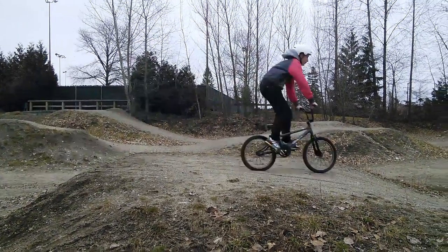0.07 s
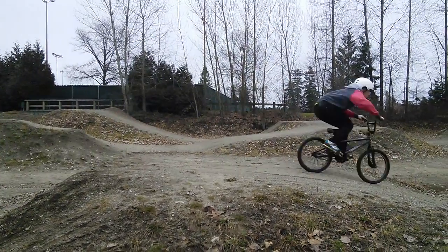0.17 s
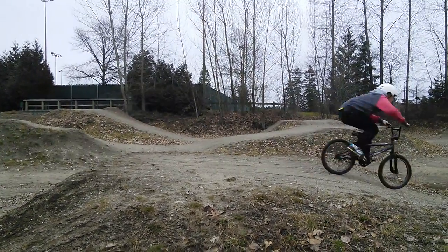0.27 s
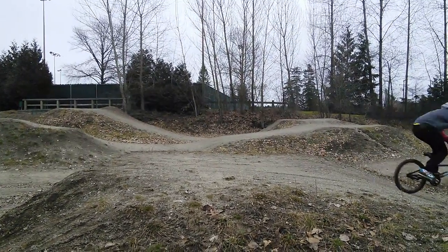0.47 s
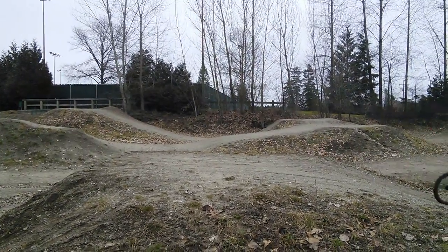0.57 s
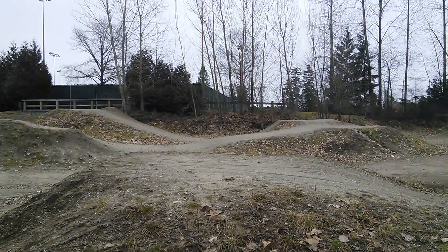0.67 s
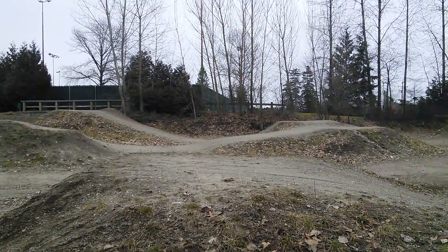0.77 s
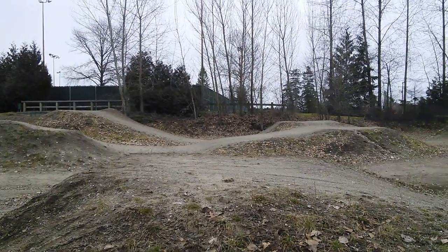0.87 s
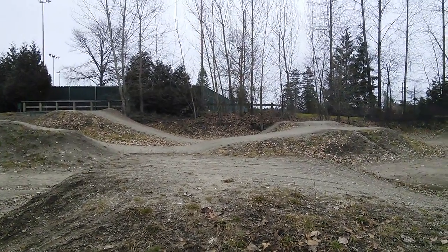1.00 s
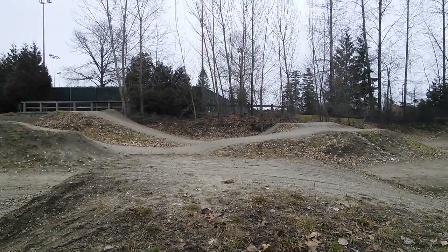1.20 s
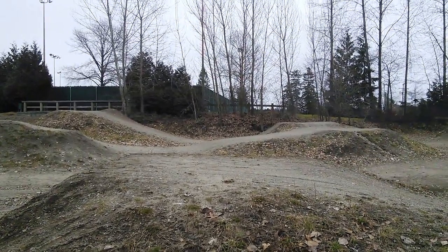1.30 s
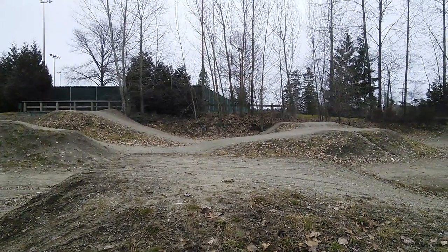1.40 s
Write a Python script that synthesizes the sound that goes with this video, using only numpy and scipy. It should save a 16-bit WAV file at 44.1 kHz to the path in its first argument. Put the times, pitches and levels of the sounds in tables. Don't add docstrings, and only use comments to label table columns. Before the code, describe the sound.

After a brief quiet moment, bicycle tyres crunch down hard and the chain rattles; the wheels grind away softly, flicking small stones, over faint distant traffic and microphone hiss on an open dirt track.

```python
import sys
import numpy as np
from scipy import signal
from scipy.fft import rfft, irfft
from scipy.io import wavfile
from scipy.ndimage import uniform_filter1d, map_coordinates

SR = 44100
rng = np.random.default_rng(int(sys.argv[2]) if len(sys.argv) > 2 else 0)


def unload_wav(signal):
    wavfile.write(
        sys.argv[1],
        SR,
        np.round(np.clip(np.atleast_2d(signal).T, -1, 1) * 32767).astype(np.int16),
    )


def invert_db(level):
    return 10 ** (np.asarray(level, dtype=float) / 20)


N = 63945


def unit(x):
    return x / np.sqrt(np.mean(x ** 2))


def colour(x, shape, lo_hz=20.0, hi_hz=20100.0):
    log_f = np.log(np.maximum(np.arange(len(x) // 2 + 1) * SR / len(x), 1))
    shape_hz, shape_db = np.array(shape, float).T

    def above(hz):
        return 0.5 + 0.5 * np.tanh((log_f - np.log(hz)) * 6)

    gain = invert_db(np.interp(log_f, np.log(shape_hz), shape_db))
    return irfft(rfft(x) * gain * (above(lo_hz) - above(hi_hz)), len(x))


def walk(rate):
    hold = int(SR / rate)
    steps = np.repeat(rng.standard_normal(N // hold + 1), hold)
    return 1.3 * uniform_filter1d(uniform_filter1d(steps, hold), hold)[:N]


def lively(x, shape, common_db, own_db, rate):
    band_hz = 20 * 2 ** np.arange(0, 10.1, 0.5)
    total = np.zeros(N)
    for lo_hz, hi_hz in zip(band_hz, band_hz[1:]):
        total += invert_db(common_db + own_db * walk(rate)) * colour(x, shape, lo_hz, hi_hz)
    return unit(total)


def add(out, s, x):
    i = int(s * SR)
    out[i:i + len(x)] += x[:N - i]


def ring(hz, t60, t, rise=0.0002):
    return np.sin(2 * np.pi * hz * t) * np.exp(-np.log(1000) * t / t60) * (1 - np.exp(-t / rise))


def grit(size):
    grains_per_s, spread_db, grain_share = 3000, 3.0, 0.6
    chance, draw = rng.random((size, 2)).T
    grain_size = invert_db(spread_db * np.minimum(-np.log(draw), 3.0))
    grains = (chance < grains_per_s / SR) * grain_size * rng.choice([-1, 1], size)
    return grain_share * unit(grains) + (1 - grain_share) * rng.standard_normal(size)


def background():
    # (f/Hz, level/dB)
    town_tone = [(30, -37), (90, -2), (150, -12.5), (370, -15), (700, -5), (1100, -13.5), (2600, -20.5),
                 (3600, -33.5)]
    # (f/Hz, level/dB)
    hiss_tone = [(3000, -30), (5300, -15), (6500, -3), (9000, 0), (15500, -1)]
    town = lively(rng.standard_normal(N), town_tone, 0, 1.2, 8.3)
    hiss = unit(colour(rng.standard_normal(N), hiss_tone))
    return invert_db(-58) * town + invert_db(-64.5) * hiss


def whirr():
    # (t/s, half-width/s, f/Hz, level/dB)
    peak_s, half_s, hz, db = (.115, .05, 2200, -59)
    air = unit(colour(rng.standard_normal(N), [(hz / 2, -30), (hz, 0), (hz * 1.5, -25)]))
    return invert_db(db) * air * np.exp(-((np.arange(N) / SR - peak_s) / half_s) ** 2)


def ground(x):
    # (lag/s, lag/s)
    lag_s = (.00047, .00035)
    top_hz = 2500
    late = map_coordinates(x, [np.arange(N) - np.linspace(*lag_s, N) * SR], mode="nearest")
    return x + invert_db(-1) * colour(late, [(top_hz, 0), (2 * top_hz, -18), (20000, -40)])


def rolling():
    # (t/s, load on the tyres/dB, spray of fine grit/dB)
    loads = [(.19, -34.5, -45), (.28, -44, -45), (.36, -43, -50), (.45, -44, -52), (.55, -44.5, -57),
             (.60, -44.5, -54.5), (.64, -43, -57), (.76, -43.5, -50.5), (.79, -47, -53), (.90, -50, -55),
             (.925, -50, -55), (1.05, -48.5, -52), (1.17, -53.5, -53.5), (1.211, -54, -60.5),
             (1.28, -55, -58.5), (1.35, -54, -58), (1.45, -56.5, -65)]
    # (f/Hz, level/dB)
    tread_tone = [(60, -62), (250, -14.5), (480, -24), (750, -5), (1500, -5), (2270, -6.5), (3600, -1.5),
                  (12000, -29.5)]
    # (f/Hz, level/dB)
    spray_tone = [(3000, -12), (6000, -5.5), (9000, -10), (12000, -10), (16000, -12.5)]
    touch_s, flicker_db = 0.1934, 1.5
    t = np.arange(N) / SR
    load_s, load_db, spray_db = np.array(loads).T
    patch_db = 1.2 * walk(60.8)
    tread = lively(grit(N), tread_tone, patch_db, flicker_db, 19.83)
    tread *= invert_db(-1 + np.interp(t, load_s, load_db))
    spray = lively(grit(N), spray_tone, patch_db, flicker_db, 20.74)
    spray *= invert_db(2.5 + np.interp(t, load_s, spray_db))
    return (ground(tread) + spray) * np.clip((t - touch_s) / 0.012, 0, 1)


def stones():
    # (t/s, peak level/dB, f/Hz, treble against body/dB)
    pebbles = [(0.409, -25, 2220, -20.5), (.513, -39, 3020, -20), (.5246, -30, 2840, -15),
               (0.5352, -36, 2380, -16), (0.5647, -26, 3020, -19), (.5745, -27.5, 3500, -27),
               (0.6058, -25.5, 3050, -19), (0.62, -42, 3800, -22), (0.713, -31, 3820, -16),
               (0.747, -22, 2280, -15), (0.9353, -25, 2160, -32), (0.9385, -29, 2640, -12),
               (0.975, -38, 2390, -12), (1.0311, -37, 3360, -5), (1.158, -39, 2060, -14),
               (0.4592, -40, 2360, -4.5), (0.743, -52, 3000, 3), (0.1454, -69, 1980, 7)]
    t60_s, rise_s, glide_per_s = 0.012, 0.0013, 90
    out, t = np.zeros(N), np.arange(SR // 50) / SR
    bent = t * (1 + glide_per_s * np.minimum(t, 0.004))
    for s, db, hz, treble_db in pebbles:
        body = ring(0.8 * hz, t60_s, bent, rise_s)
        body += 0.87 * ring(1.27 * hz, 0.59 * t60_s, bent, rise_s)
        crack = unit(colour(rng.standard_normal(len(t)), [(1500, -10), (5000, 2), (16000, -12)]))
        crack *= np.exp(-t / 0.00072)
        add(out, s - 0.0005, invert_db(db) * (2 * body + invert_db(treble_db + 11) * crack))
    return out


def chain():
    # (level/dB, t60/s)
    modes = [(-6.5, 0.1), (-7, 0.047), (2.5, 0.04), (-7, 0.019), (12, 0.0052), (-11, 0.011), (-10.5, 0.053),
             (-21, 0.0091), (-11, 0.029), (4.5, 0.0086), (-2, .028), (-7, 0.018), (-13.5, 0.045)]
    mode_hz = [7610, 7760, 8420, 8520, 8900, 9275, 10160, 11190, 13330, 13770, 15560, 2340, 4710]
    # (t/s, level/dB, free ringing/s, extra drive of the link pair/dB, fall-off from it/dB per kHz)
    slaps = [
        (0.252, -14, 0.0015, -6, 1.5),
        (0.2536, -12, 0.016, 0.5, 0.8),
        (0.4576, -52, 0.0046, 2, 5),
        (.551, -50, .008, 5.5, 12),
        (.6356, -47, .02, 6, 4),
        (.673, -35.5, .012, -6, 2.5),
        (0.7279, -31.5, .018, -10, 1),
        (0.827, -54, .015, 5, 5),
        (0.9163, -40, .004, -8, 7),
    ]
    caught_db, catch_s = -12, 0.003
    out, t = np.zeros(N), np.arange(SR // 10) / SR
    hz = np.array(mode_hz)[:, None]
    mode_db, t60 = np.array(modes).T[:, :, None]
    away_hz = abs(hz - 8470)
    for s, db, free_s, link_db, fall in slaps:
        drive_db = mode_db + link_db * (away_hz < 100) - fall * away_hz / 1000
        steel = (invert_db(drive_db) * ring(hz, t60, t, 0.0005)).sum(axis=0)
        choke_db = caught_db * np.clip((t - free_s) / catch_s, 0, 1)
        add(out, s, invert_db(db + choke_db) * steel)
    return out


def landing():
    # (t/s, level/dB, centre f/Hz, width/octaves, fade/s)
    bursts = [(0.1873, -34.5, 9800, 1.1, 0.0069), (0.197, -28, 2200, 1.6, 0.0036),
              (.204, -20.5, 8200, 1.4, 0.0019), (0.2122, -22.5, 9060, 1.1, 0.0029),
              (0.211, -23.5, 4900, 0.16, 0.0061), (0.2134, -19.5, 10800, 0.037, 0.0014),
              (.216, -23.5, 2350, 2, 0.0062), (0.2214, -24, 5060, 0.95, 0.0038),
              (0.23, -31, 11000, 0.8, 0.0019), (.241, -28.5, 2360, 3.3, 0.0048),
              (.2521, -16, 8800, 1.7, 0.0044), (0.269, -25, 2800, .9, 0.0013),
              (.271, -43, 6000, 0.52, 0.0028), (0.323, -34, 4200, 0.56, 0.013),
              (0.782, -37, 2310, 0.48, 0.021), (.928, -41.5, 8500, 0.32, 0.021),
              (.462, -53, 235, 0.23, 0.053), (0.579, -51.5, 247, 0.18, 0.011), (.64, -37, 767, 0.11, 0.011),
              (.705, -47.5, 696, 0.23, 0.017), (.785, -52.5, 344, 0.21, 0.035),
              (1.324, -48.5, 3520, 0.32, 0.044), (.31, -41, 2400, 0.14, .04)]
    # (t/s, level/dB, f/Hz, t60/s)
    thumps = [
        (.1967, -31.5, 290, 0.014),
        (.199, -25, 660, 0.014),
        (.2105, -32, 528, 0.067),
        (.2535, -25, 1240, 0.014),
        (.256, -41.5, 622, 0.11),
        (0.209, -64, 50, 0.076),
    ]
    out, t = np.zeros(N), np.arange(SR // 10) / SR
    for s, db, hz, octaves, fade_s in bursts:
        bell = [(hz * 2 ** (k * octaves), -3 * k * k) for k in range(-4, 5)]
        envelope = np.exp(-t / fade_s) * (1 - np.exp(-t / (0.12 * fade_s)))
        add(out, s, invert_db(db) * unit(colour(grit(len(t)), bell)) * envelope)
    for s, db, hz, t60 in thumps:
        add(out, s, invert_db(db) * ring(hz, t60, t, rise=0.0009))
    return out


def mounds(hits):
    t = np.arange(SR // 5) / SR
    scatter = rng.standard_normal(len(t)) * np.exp(-np.log(1000) * t / 0.09) * (t > 0.002)
    return invert_db(-19) * signal.fftconvolve(hits, scatter / np.sqrt(np.sum(scatter ** 2)))[:N]


def scene():
    hits = chain() + landing() + stones()
    return (hits + mounds(hits) + rolling() + whirr() + background())[None]


def low_pass(x):
    return signal.sosfilt(signal.butter(12, 16980, fs=SR, output="sos"), x)


def record(dry):
    top_cut = signal.ellip(7, 0.2, 36, 15750, fs=SR, output="sos")
    return low_pass(signal.sosfilt(top_cut, dry))


dry = scene()
out = record(dry)
unload_wav(out)
```